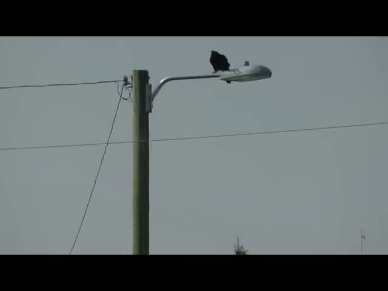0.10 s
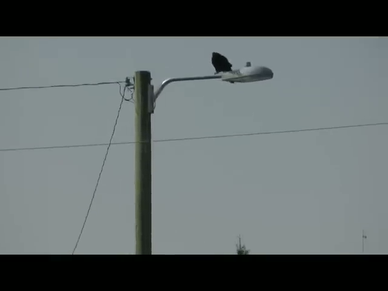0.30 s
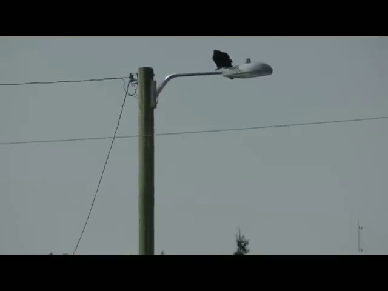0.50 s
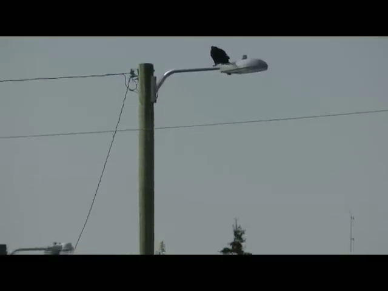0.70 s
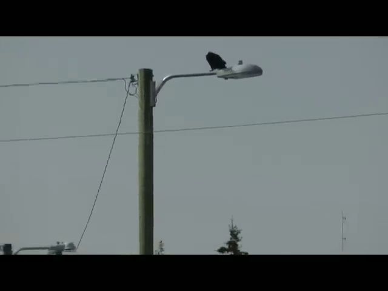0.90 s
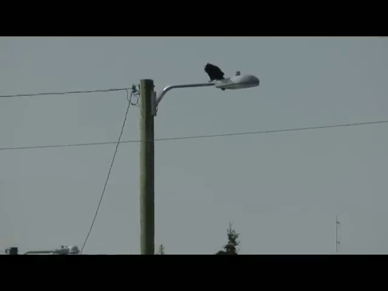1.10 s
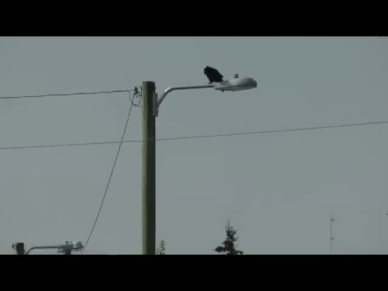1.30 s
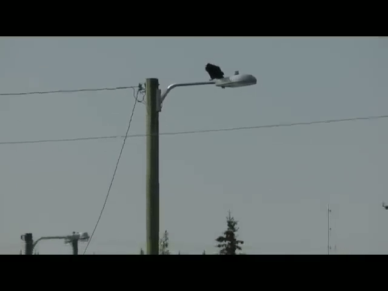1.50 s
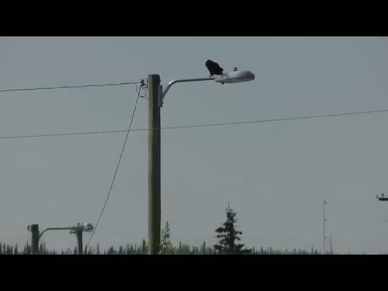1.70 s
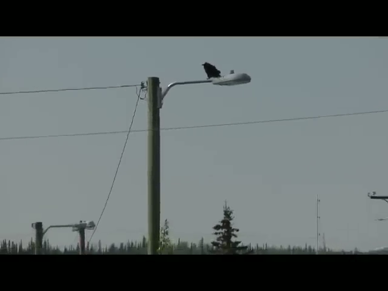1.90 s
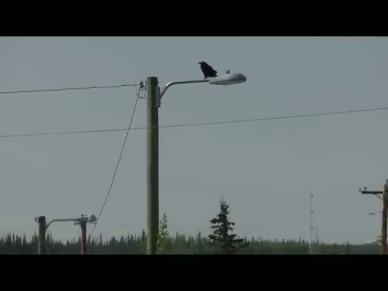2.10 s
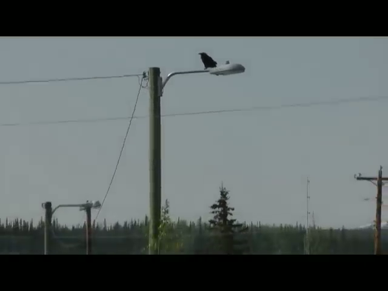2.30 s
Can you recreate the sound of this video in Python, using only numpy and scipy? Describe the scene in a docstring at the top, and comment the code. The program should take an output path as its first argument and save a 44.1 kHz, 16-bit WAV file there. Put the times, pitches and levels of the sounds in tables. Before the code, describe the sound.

A raven gives clear two-note calls and a short rattling croak, echoing through open forest.

```python
"""Raven calling in an echoing forest

A raven on a street lamp gives three clear two-note calls and one short croak: the notes are stacked
harmonics, the croak a low tone shaken by slowing pulses that ring throat resonances. Decaying noise
makes the forest's long echo, mostly from the right, where an earlier call is still dying away. Beneath lie
quiet air and faint rustling (filtered noise), a distant whine (two sines) and wind puffs on the microphone."""
import sys
import numpy as np
from scipy import signal
from scipy.fft import rfft, irfft
from scipy.io import wavfile
from scipy.ndimage import uniform_filter1d

SR = 44100
rng = np.random.default_rng(int(sys.argv[2]) if len(sys.argv) > 2 else 0)


def to_wav(sig):
    """Store sig (one row per channel, or 1-D mono) as 16-bit WAV at the path in sys.argv[1].

    Samples outside -1..1 are clipped; the rate is SR.
    """
    pcm = np.clip(np.atleast_2d(sig), -1, 1) * 32767
    pcm = np.round(pcm).astype(np.int16)
    wavfile.write(sys.argv[1], SR, pcm.T)  # frames by channels


N = 101430
T = np.arange(N) / SR
BINS_HZ = np.fft.rfftfreq(N, 1 / SR)
JITTER_HZ = 125  # how fast the raven's pitch trembles
ECHO_PAN_DB = -8  # left minus right: the forest answers mostly from the right


def from_db(db):
    """Decibels to gain."""
    return 10 ** (np.asarray(db) / 20)


def rms_one(x):
    """Scale to unit rms."""
    return x / np.sqrt(np.mean(x ** 2) + 1e-20)


def at_hz(points, hz):
    """Read a spectrum on a log-frequency axis."""
    f, value = np.transpose(points)
    return np.interp(np.log(np.maximum(hz, 1)), np.log(f), value)


def coloured(x, spectrum):
    """Filter a sound by a spectrum of (frequency_hz, level_db)."""
    return irfft(rfft(x) * from_db(at_hz(spectrum, BINS_HZ)), N)


def pan(db):
    """Left and right gains, mean 1, for a level difference of left minus right."""
    gains = from_db(np.array([[.5], [-.5]]) * db)
    return gains / gains.mean(axis=0)


def noise(spectrum):
    """Steady noise with this spectrum, rms 1."""
    return rms_one(coloured(rng.standard_normal(N), spectrum))


def drift(hz):
    """Random wander, mostly slower than this rate, rms 1."""
    return rms_one(irfft(rfft(rng.standard_normal(N)) / (1 + (BINS_HZ / hz) ** 2), N))


def swells(rows):
    """Bell-shaped swells from rows of (centre_s, half_length_s, level_db)."""
    return sum(from_db(db) * np.exp(-((T - s) / half_s) ** 2) for s, half_s, db in rows)


def gesture(rows, fade_s=0.0028):
    """A gate over the span of a curve, then each of its columns smoothed in time."""
    s, *columns = np.transpose(rows)
    gate = np.clip(np.minimum(T - s[0], s[-1] - T) / fade_s + .5, 0, 1)
    return [gate] + [uniform_filter1d(np.interp(T, s, c), size=180) for c in columns]


# quiet air and hiss at the microphone, one spectrum a side: frequency_hz, relative_level_db
AIR_LEFT = [(20, -21), (60, -2.5), (110, 5), (350, -1), (600, -10), (1000, -13.5), (2000, -9),
            (5000, -19.5), (8800, -21.5), (9300, -34)]
AIR_RIGHT = [(20, -7), (110, 0.5), (350, -6.5), (600, -8.5), (1000, -16.5), (2000, -11), (9000, -19.5),
             (15000, -19.5)]
AIR_LEFT_DB, AIR_RIGHT_DB = -59.5, -57


def quiet_air():
    """Steady filtered noise, independent on the two sides."""
    left = from_db(AIR_LEFT_DB) * noise(AIR_LEFT)
    right = from_db(AIR_RIGHT_DB) * noise(AIR_RIGHT)
    return np.array([left, right])


# faint far-off whine, fundamental then second harmonic: level_db (before wavering), left_minus_right_db
WHINE = [(-75.5, -5), (-74, -14)]
WHINE_HZ = 427


def distant_whine():
    """Two sines wavering in level and pitch, a quarter turn apart between the sides."""
    side_turn = np.array([[0], [np.pi / 2]])
    whine = 0
    for k, (db, pan_db) in enumerate(WHINE, 1):
        phase = 2 * np.pi * np.cumsum(k * WHINE_HZ * (1 + 0.0033 * drift(15.0))) / SR
        level = np.sqrt(2) * from_db(db + 2 * drift(0.43))
        whine = whine + pan(pan_db) * level * np.sin(phase + side_turn)
    return whine


# forest colour at the raven's distance: frequency_hz, relative_level_db
ECHO_COLOUR = [(500, -10), (750, 3.5), (1050, 6), (1450, 2), (1700, 2.5), (3000, 8.5), (6000, -10),
               (12000, -10)]
# how long the far forest rings on: frequency_hz, t60_s
ECHO_T60 = [(500, 4.3), (1500, 2.58), (3000, 1.2), (6000, 0.56), (12000, 0.34)]
ECHO_DB, NEAR_ECHO_DB, NEAR_ECHO_T60_S = -15, -17, 0.13


def forest(x):
    """Countless reflections from trees and ground, the treble dying first; one response a side."""
    centres = [f for f, _ in ECHO_T60]
    sides = []
    for white in rfft(coloured(rng.standard_normal((2, N)), ECHO_COLOUR)):
        response = 0
        for (_, far_t60), share in zip(ECHO_T60, np.eye(len(centres))):
            # each band overlaps its neighbours so that the shares add up to one
            band = irfft(white * at_hz(list(zip(centres, share)), BINS_HZ), N)
            for db, t60 in [(ECHO_DB, far_t60), (NEAR_ECHO_DB, min(NEAR_ECHO_T60_S, far_t60))]:
                equal_energy = np.sqrt(np.log(1e6) / (t60 * SR))  # long and short tails weigh alike
                response = response + band * from_db(db - 60 * T / t60) * equal_energy
        build_up = np.clip(T / 0.04, 0, 1)
        sides.append(signal.fftconvolve(x, response * build_up))
    return np.array(sides) * pan(ECHO_PAN_DB)


EARLIER_CALL_AGO_S, EARLIER_CALL_DB = 0.62, -4.5  # before the first call; level into the forest


def earlier_call_echo(first_call):
    """The forest still returning a two-note call like the first, given a moment before it."""
    ago = int(EARLIER_CALL_AGO_S * SR)
    return from_db(EARLIER_CALL_DB) * forest(first_call)[:, ago:ago + N]


# a faint rustle on the forest side: centre_s, half_length_s, level_db
RUSTLES = [(.18, 0.026, -61.5)]
# its spectrum: frequency_hz, relative_level_db
RUSTLE_COLOUR = [(1500, -12), (3000, -2), (13000, -17)]


def rustling():
    """Filtered noise swelling briefly, mostly on the right."""
    return pan(ECHO_PAN_DB) * swells(RUSTLES) * noise(RUSTLE_COLOUR)


# numbers of the overtones sounded beside the leading second harmonic
HARMONICS = (1, 3, 4, 5, 6, 7, 8, 9)
# breathy rasp in the voice: frequency_hz, relative_level_db
RASP = [(1000, -18.5), (1500, -11), (3000, 1), (4500, -5), (10000, -21)]
RASP_DB, VOICE_DB = -47, 0.5  # rasp against the second harmonic; gain on the whole note
FUNDAMENTAL_FOLLOWS, OVERTONES_FOLLOW = 0.55, 1.12  # dB per dB of the note's level
TREBLE_FOLLOWS = 0.32  # further dB per dB: the top overtones open most at full effort
JITTER, SHIMMER_DB = 0.0042, 2.5  # tremble of pitch (share) and of the overtones' levels
BEAK_WIDTH_HZ, TREBLE_FROM_HZ = 300, 3300


def note(curve, throat, beak_start_hz, beak_end_hz, beak_db, dulling_db_per_s):
    """A note led by its second harmonic; overtones open with effort and flare at the gliding beak resonance."""
    gate, hz, db = gesture(curve)
    start, end = curve[0][0], curve[-1][0]
    fundamental_hz = hz / 2
    phase = 2 * np.pi * np.cumsum(fundamental_hz * (1 + JITTER * drift(JITTER_HZ))) / SR
    effort_db = db - db.max()
    beak_hz = np.interp(T, [start, end], [beak_start_hz, beak_end_hz])
    # the treble tilts around the middle of the note
    dulling_db = dulling_db_per_s * ((start + end) / 2 - np.clip(T, start, end))
    treble_db = dulling_db + TREBLE_FOLLOWS * effort_db
    voice = from_db(effort_db) * (np.sin(2 * phase) + from_db(RASP_DB) * noise(RASP))
    for k, level_db in zip(HARMONICS, throat):
        if k == 1:
            swell_db = FUNDAMENTAL_FOLLOWS * effort_db
        else:
            flare_db = beak_db * np.exp(-((k * fundamental_hz - beak_hz) / BEAK_WIDTH_HZ) ** 2)
            if k * fundamental_hz.min() > TREBLE_FROM_HZ:
                flare_db = flare_db + treble_db
            swell_db = OVERTONES_FOLLOW * effort_db + flare_db + SHIMMER_DB * drift(56)
        overtone = np.sin(k * phase + rng.uniform(0, 2 * np.pi))
        voice = voice + from_db(level_db + swell_db) * overtone
    return np.sqrt(2) * gate * from_db(VOICE_DB + db.max()) * voice


# the six notes, two a call, as curves: time_s, pitch_hz (second harmonic), level_db (before VOICE_DB)
NOTES = [
    [(.207, 1196, -56.5), (.22, 1406, -34), (.232, 1412, -25.5), (.253, 1464, -23.7), (.268, 1497, -27.5),
     (.279, 1410, -34), (.285, 1310, -45.5)],
    [(.303, 1390, -48), (.313, 1395, -55), (.319, 1411, -37), (.33, 1438, -47), (.335, 1501, -28),
     (.344, 1506, -31), (.362, 1481, -31), (.373, 1407, -42), (.38, 1400, -52)],
    [(.71, 1605, -60), (.724, 1624, -35), (.741, 1658, -32), (.753, 1588, -32), (.766, 1524, -38.5),
     (.781, 1520, -38), (.79, 1450, -86)],
    [(.824, 1626, -75), (.829, 1637, -39), (.834, 1596, -31.5), (.839, 1476, -34.5), (.846, 1534, -38),
     (.852, 1673, -26), (.866, 1665, -26), (.873, 1637, -32.5), (.88, 1400, -50)],
    [(1.693, 1230, -58), (1.708, 1302, -51), (1.724, 1388, -36.5), (1.745, 1396, -31), (1.764, 1434, -35),
     (1.783, 1335, -47.5)],
    [(1.832, 1408, -53), (1.838, 1506, -48), (1.853, 1571, -44.5), (1.865, 1480, -43), (1.873, 1445, -45)],
]
# throat colour, a row a note, a column for each of HARMONICS: level_db against the second harmonic
THROATS = [(-19, -20.5, -30.5, -50, -53, -53, -43.5, -40), (-15, -18, -28.5, -38.5, -48.5, -41, -37, -42),
           (-8.5, -14, -19.5, -26, -28.5, -34, -42, -48), (-16.5, -19, -28, -28.5, -34.5, -48, -66, -62),
           (-14.5, -22.5, -32.5, -34.5, -29.5, -45, -45, -49), (-4.5, -20, -28, -30.5, -25, -44, -48, -52)]
# a row a note: beak_start_hz, beak_end_hz, beak_height_db, treble_dulling_db_per_s, left_minus_right_db
NOTE_COLOURS = [(3940, 2800, 10.5, 301, -6.5), (3230, 2850, 7.5, -150, -4.5), (3210, 3660, 10.5, 60, -3.5),
                (3150, 3270, 7.5, 5, -3), (3505, 3100, 15.5, 326, -5.5), (4190, 3600, 6.5, 3, -4)]


def clear_notes():
    """The six notes in mono, and the same placed left to right and summed."""
    notes = [note(curve, throat, *colour[:-1])
             for curve, throat, colour in zip(NOTES, THROATS, NOTE_COLOURS)]
    placed = sum(pan(colour[-1]) * x for x, colour in zip(notes, NOTE_COLOURS))
    return notes, placed


# the voice breaks up hoarsely around the first two notes: centre_s, half_length_s, level_db
BREAKS = [(.279, 0.0083, -49.5), (.299, 0.005, -51.5), (.332, 0.0047, -56.5)]
# spectrum of the hoarse pulses: frequency_hz, relative_level_db
BREAK_COLOUR = [(1400, -23), (2700, 3), (3400, -10.5), (4100, -7), (9000, -33)]
BREAK_HZ, BREAK_JITTER = 685, .018  # pulse rate and its unsteadiness (share)


def voice_breaks():
    """Where the voice cracks, its pulses turn sharp and unsteady for a moment."""
    turns = np.cumsum(BREAK_HZ * (1 + BREAK_JITTER * drift(JITTER_HZ))) / SR
    pulses = np.diff(np.floor(turns), prepend=0)
    return swells(BREAKS) * rms_one(coloured(pulses - pulses.mean(), BREAK_COLOUR))


TICK_S, BILL_CLICK_DB, BILL_CLICK_DECAY_S = .309, -52, .003


def bill_click():
    """A tiny dry tick as the second note begins: a burst of bright noise dying at once."""
    age = T - TICK_S
    tick = noise([(1000, -27), (4000, -7), (8000, 4), (13000, -20)])
    return from_db(BILL_CLICK_DB) * tick * (age > 0) * np.exp(-abs(age) / BILL_CLICK_DECAY_S)


def ring(clicks, hz, t60):
    """A unit click sets a sine of about height 1 ringing."""
    r, w = from_db(-60 / (t60 * SR)), 2 * np.pi * hz / SR
    return signal.lfilter([0, np.sin(w)], [1, -2 * r * np.cos(w), r * r], clicks + 1e-18)


# the croak as a curve: time_s, pitch_hz (second harmonic), tone_db, rattle_db (each before its own mix)
CROAK = [(1.317, 1049, -54, -63), (1.321, 1049, -39.5, -52), (1.334, 1017, -42.5, -46),
         (1.357, 1082, -36, -47), (1.38, 1051, -39, -42.5), (1.404, 1015, -39.5, -53),
         (1.42, 995, -42, -54), (1.442, 990, -52, -74)]
# its tone, in order from the fundamental: harmonic_number, relative_level_db
CROAK_HARMONICS = [(1, -18.5), (2, -0.5), (3, -19.5), (4, -24), (5, -16.5), (6, -20)]
# throat resonances struck by each pulse: frequency_hz, relative_level_db, t60_s
RATTLE_MODES = [(2550, -5.5, 0.024), (3117, 6, 0.039), (3300, 3, 0.033), (4647, -5.5, 0.041),
                (5550, -8.5, 0.016)]
# the air let out by each pulse: frequency_hz, relative_level_db
RATTLE_NOISE = [(1000, -11.5), (1900, -12), (2250, 1.5), (3200, 0.5), (4300, -13), (4680, -14), (5150, -17),
                (5650, -2), (6400, -17), (7000, -23), (9400, -23), (12000, -43)]
RATTLE_START_S, RATTLE_HZ, RATTLE_SLOWS_HZ_PER_S = 1.3205, 80, 75
RATTLE_DB, RATTLE_NOISE_DB = -1, -3  # rings and air within the rattle
RATTLE_DECAY_S, RATTLE_UNEVEN_DB = .0045, 2  # of the air bursts
CROAK_BEND, CROAK_JITTER = 0.039, 0.01417  # pitch fall across a pulse, random tremble (shares)
THROB_GROWS_PER_S = 8.3
THROB_LAG = 0.05  # share of a pulse by which the tone's dip trails it


def croak():
    """A low note shaken by slowing pulses; each pulse rings the throat and lets out a burst of air."""
    gate, hz, tone_db, rattle_db = gesture(CROAK)
    since_start = T - RATTLE_START_S
    rate = np.maximum(RATTLE_HZ - RATTLE_SLOWS_HZ_PER_S * since_start, 20)
    turns = np.cumsum(rate * (T >= RATTLE_START_S)) / SR
    cycle = turns % 1
    clicks = np.diff(np.ceil(turns), prepend=0)

    bend = CROAK_BEND * (.5 - cycle) + CROAK_JITTER * drift(JITTER_HZ)
    phase = 2 * np.pi * np.cumsum(hz / 2 * (1 + bend)) / SR
    tone = sum(from_db(db) * np.sin(k * phase) for k, (_, db) in enumerate(CROAK_HARMONICS, 1))
    throb = np.clip(THROB_GROWS_PER_S * since_start, 0, 1)
    throbbing = 1 - throb * np.cos(2 * np.pi * (cycle - THROB_LAG))
    tone = np.sqrt(2) * from_db(tone_db) * tone * throbbing

    rings = 0
    for k, (f, db, t60) in enumerate(RATTLE_MODES):
        uneven_clicks = clicks * from_db(2 * rng.standard_normal(N))
        rings = rings + (-1) ** k * from_db(db) * ring(uneven_clicks, f, t60)  # alternating polarity
    burst = np.exp(-cycle / rate / RATTLE_DECAY_S) * (turns > 0)
    air = noise(RATTLE_NOISE) * burst * from_db(RATTLE_UNEVEN_DB * drift(RATTLE_HZ))
    sounding = gate > 0
    rattle = from_db(RATTLE_DB) * rings / rings[sounding].std()
    rattle = rattle + from_db(RATTLE_NOISE_DB) * air / air[sounding].std()
    return gate * (tone + from_db(rattle_db) * rattle)


# puffs of wind on the microphone: centre_s, half_length_s, level_db
PUFFS = [(1.884, 0.044, -60), (2.089, 0.022, -49.5), (2.219, 0.025, -56)]
# their low rumble: frequency_hz, relative_level_db
PUFF_COLOUR = [(15, 2.5), (40, 1), (70, -6), (2000, -80)]
PUFF_PAN_DB = 1


def wind_puffs():
    """Short swells of low noise, independent on the two sides."""
    rumble = np.array([noise(PUFF_COLOUR), noise(PUFF_COLOUR)])
    return pan(PUFF_PAN_DB) * swells(PUFFS) * rumble


# balance of the raven's direct sound at the microphone: frequency_hz, left_minus_right_db
VOICE_BALANCE = [(500, -1), (750, -7), (1050, 2), (1500, 1.5), (2200, 3.5), (3000, -2), (6000, -5.5),
                 (12000, -3)]


def balance_voice(direct):
    """Lean each frequency of the direct voice to one side."""
    return irfft(rfft(direct) * pan(at_hz(VOICE_BALANCE, BINS_HZ)), N)


# how strongly each two-note call carries into the forest, a value a call: level_db
CALL_ECHO_DB = [-1, -2.5, 3.5]
CROAK_ECHO_DB, CROAK_PAN_DB = -1, -4.5  # croak into the forest; left minus right
FIRST_ECHO_S, FIRST_ECHO_DB = .04, -29  # one early reflection from nearby


def scene():
    """The raven, its echoes and the background."""
    notes, placed_notes = clear_notes()
    low_croak = croak()
    hoarse = voice_breaks() + bill_click()
    direct = balance_voice(placed_notes + pan(CROAK_PAN_DB) * (low_croak + hoarse))

    carried = sum(from_db(CALL_ECHO_DB[i // 2]) * x for i, x in enumerate(notes))
    echo = forest(carried + hoarse + from_db(CROAK_ECHO_DB) * low_croak)[:, :N]
    earlier = earlier_call_echo(notes[0] + notes[1])
    delayed = np.interp(T - FIRST_ECHO_S, T, carried + low_croak)
    first_echo = from_db(FIRST_ECHO_DB) * pan(ECHO_PAN_DB) * delayed
    background = quiet_air() + distant_whine() + rustling() + wind_puffs()
    return direct + first_echo + echo + earlier + background


CUTOFF_HZ = 15600


def record(dry):
    """A steep low-pass removes the very top."""
    low_pass = signal.ellip(12, .1, 80, CUTOFF_HZ, fs=SR, output="sos")
    return signal.sosfilt(low_pass, dry)


dry = scene()
out = record(dry)
to_wav(out)
```